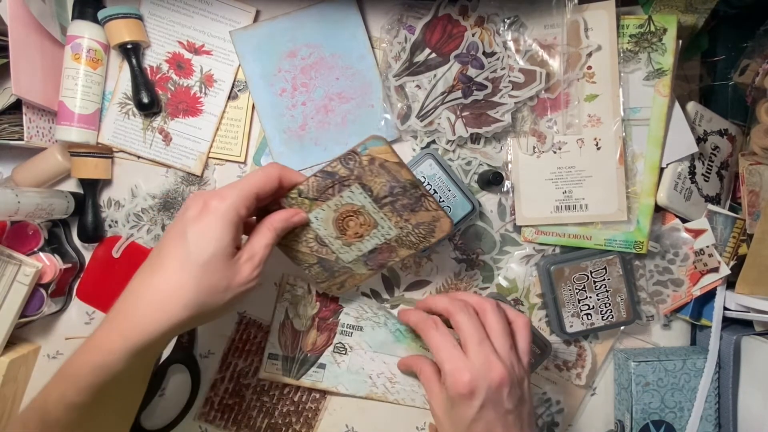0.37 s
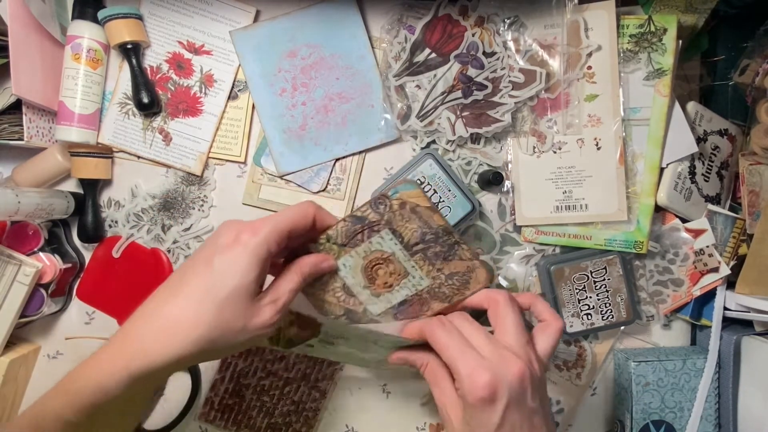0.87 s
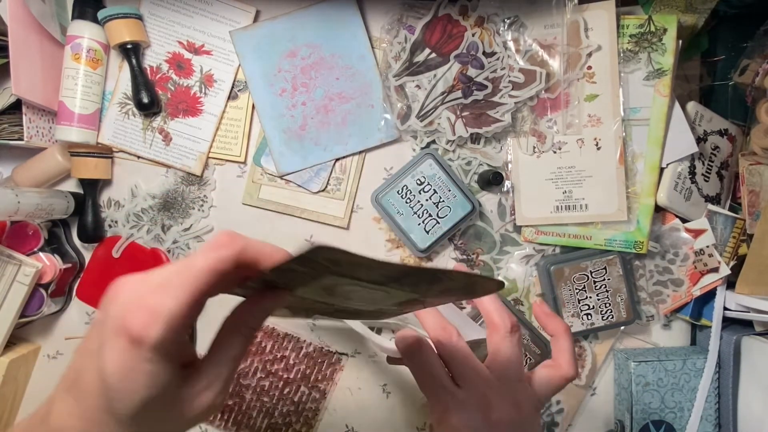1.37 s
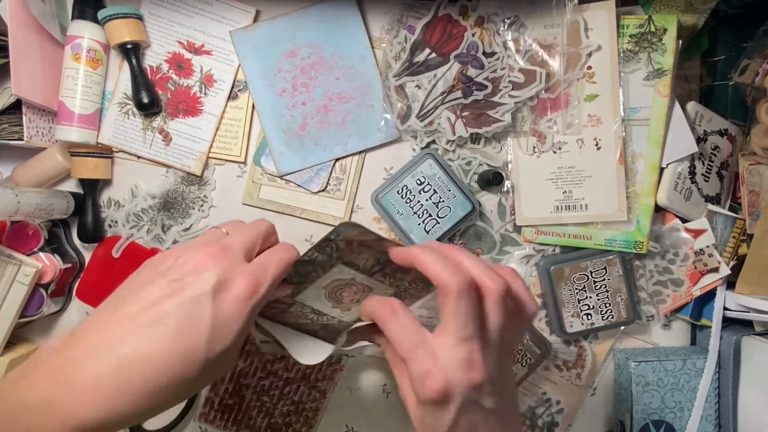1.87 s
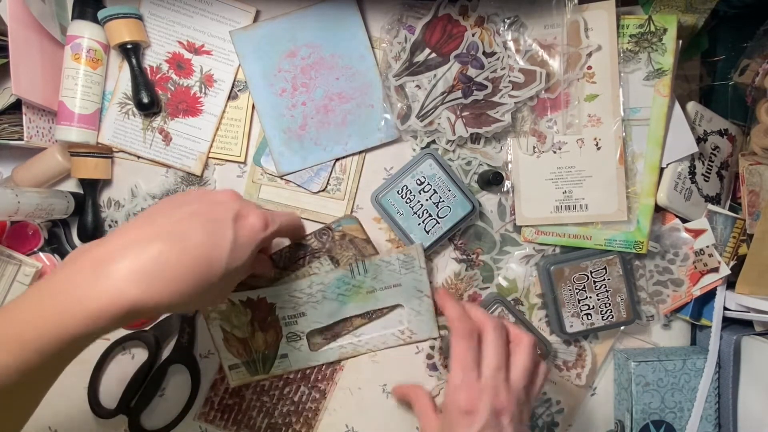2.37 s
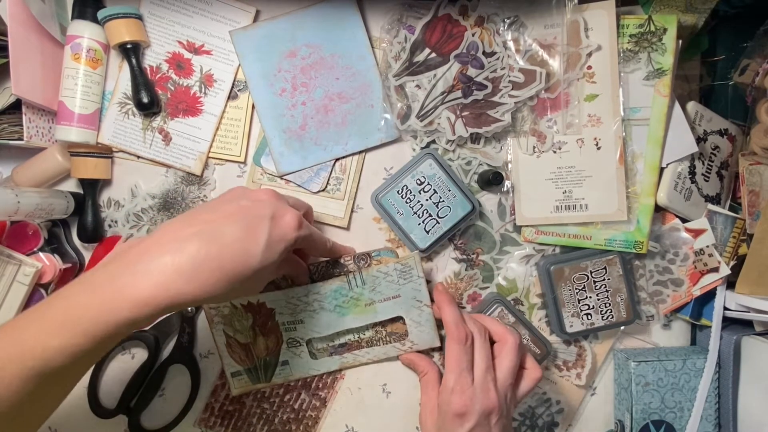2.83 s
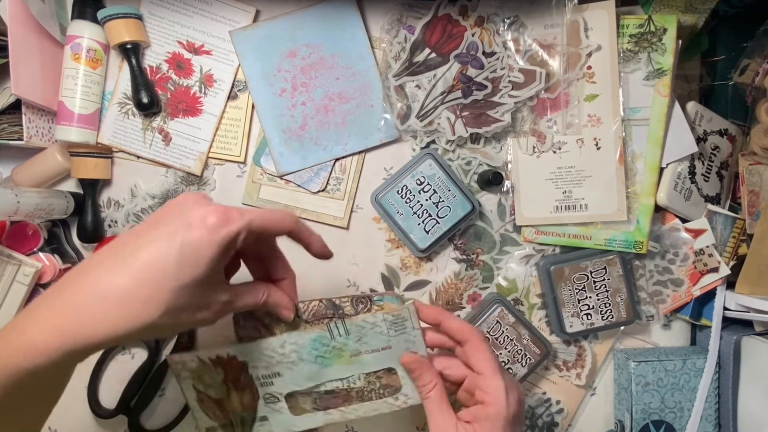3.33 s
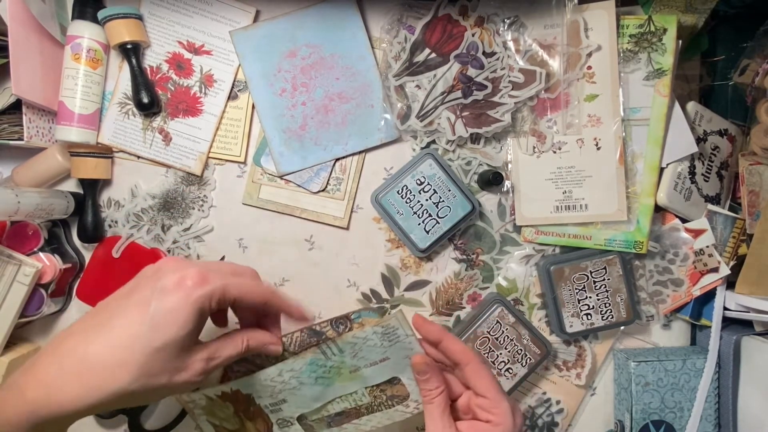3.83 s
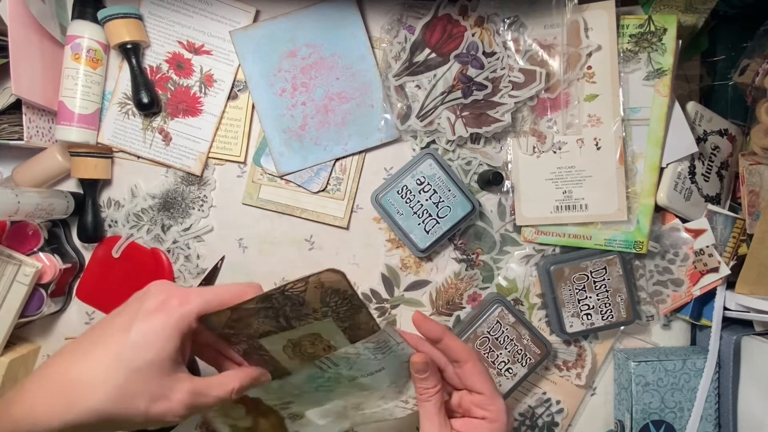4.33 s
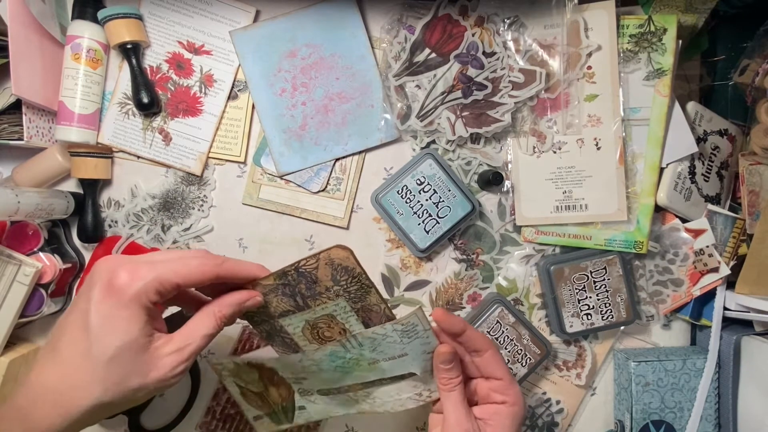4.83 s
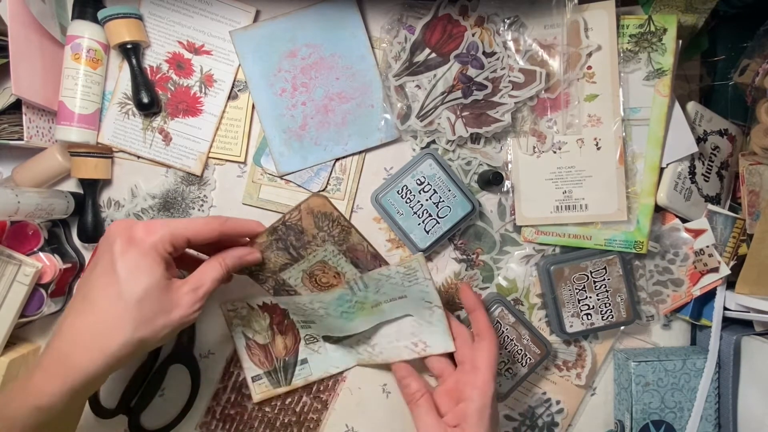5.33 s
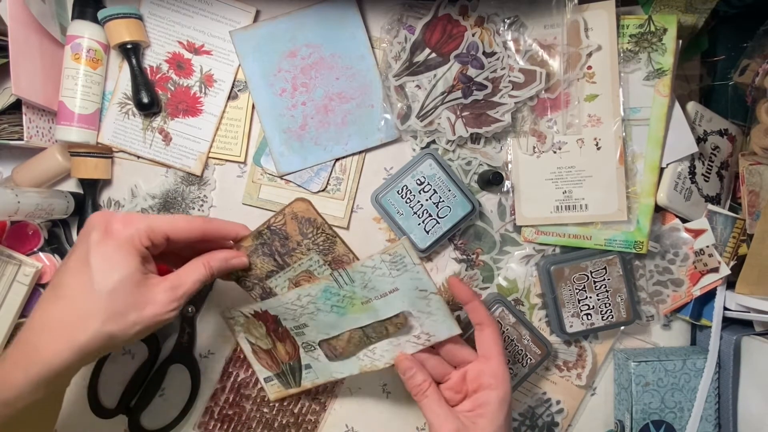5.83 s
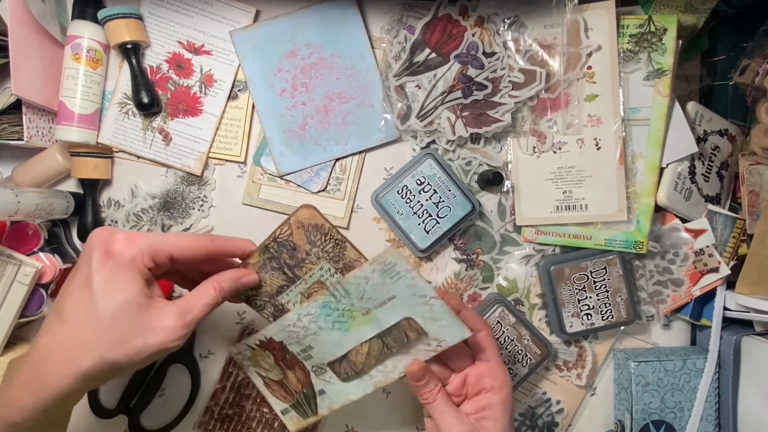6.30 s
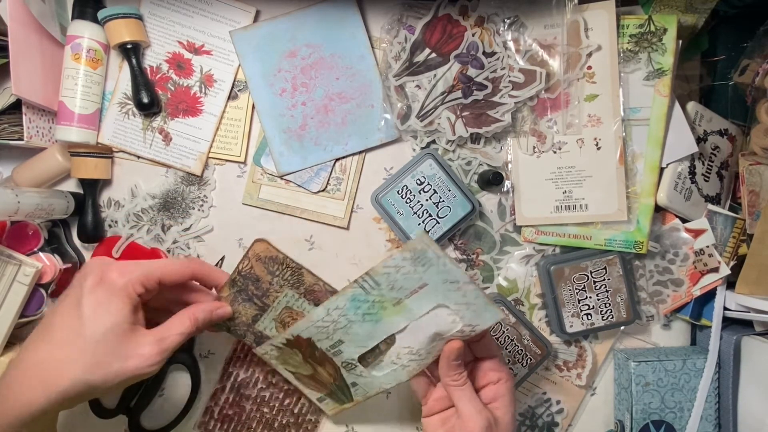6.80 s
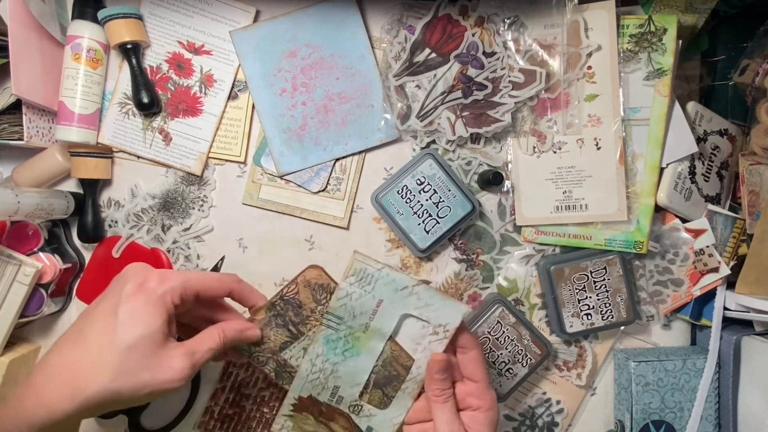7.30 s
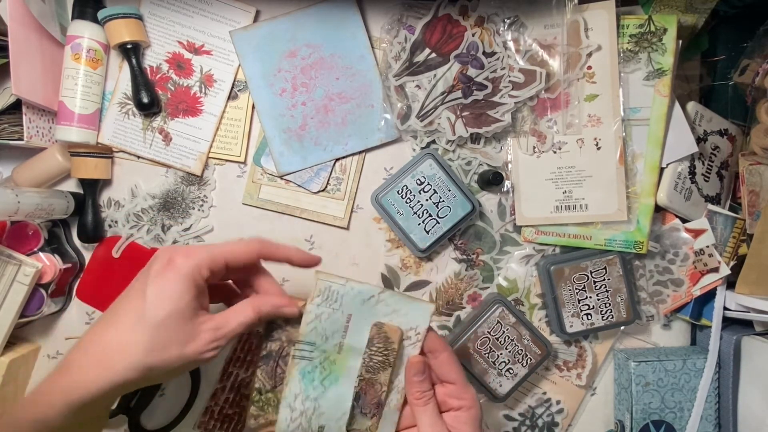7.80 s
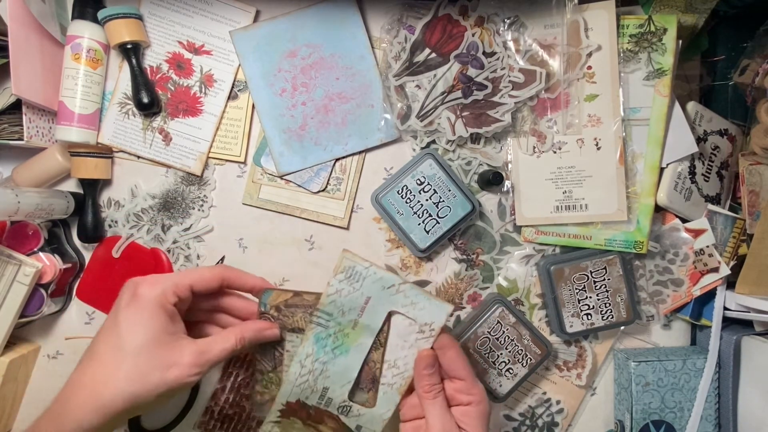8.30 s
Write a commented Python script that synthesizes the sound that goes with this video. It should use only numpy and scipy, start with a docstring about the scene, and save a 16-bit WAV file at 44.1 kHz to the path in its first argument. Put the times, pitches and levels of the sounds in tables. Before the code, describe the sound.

Hands fiddle with crisp paper at a table: rustling strokes, creases popping, hollow papery flutter, brief pauses, a few soft low bumps.

```python
"""Card in a paper pocket

Hands slide a card in and out of a paper pocket above a craft table, close to two microphone ports.
Rubbing strokes are clumped stick-slip clicks: sliding fibres hiss, bending creases crackle.
Creases flip with sharp noise bursts through resonances, and the hollow pocket rings near 900 Hz.
The card taps once as a decaying sine; wrist bumps are sagging sines over faint filtered-noise rumble and hiss."""
import sys
import numpy as np
from scipy import signal
from scipy.io import wavfile
from scipy.ndimage import uniform_filter1d

SR = 44100
rng = np.random.default_rng(int(sys.argv[2]) if len(sys.argv) > 2 else 0)


def ratio(d):
    """dB to gain"""
    e = np.asarray(d, float) / 20
    return 10 ** e


def waveform_to_disk(signal):
    """Save audio, clipped to [-1, 1], as 16-bit WAV at the path in sys.argv[1]."""
    frames = np.transpose(np.atleast_2d(signal))
    scaled = np.clip(frames, -1, 1) * 32767
    samples = np.round(scaled).astype(np.int16)
    wavfile.write(sys.argv[1], SR, samples)


N = 371322

# hand strokes: (peak time [s], swell [s], fade [s], sliding level at 8.5-12.5 kHz [dB], flexing level [dB])
STROKES = [(0, 0.007, 0.05, -83.5, -75), (0.069, 0.018, 0.041, -91.5, -74),
           (0.174, 0.033, 0.026, -64.5, -61), (0.18, 0.073, 0.063, -83, -62),
           (0.255, 0.024, 0.038, -96, -67.0), (0.296, 0.029, 0.066, -68, -62),
           (0.392, 0.029, 0.051, -73, -60), (0.445, 0.017, 0.054, -55.5, -67),
           (0.497, 0.032, 0.095, -57.5, -47.5), (0.622, 0.04, 0.062, -58, -48.5),
           (0.676, 0.066, 0.054, -59.5, -48.5), (0.881, 0.16, 0.062, -55, -52.5),
           (0.938, 0.03, 0.065, -52, -48), (1.045, 0.03, 0.031, -48.5, -49),
           (1.127, 0.28, 0.052, -73.0, -61), (1.212, 0.047, 0.054, -68.5, -56.5),
           (1.33, 0.024, 0.041, -70.5, -58), (1.425, 0.043, 0.081, -81, -75),
           (1.522, 0.0081, 0.019, -59.0, -60), (1.565, 0.061, 0.027, -54.5, -49.5),
           (1.656, 0.053, 0.035, -49.5, -47), (1.722, 0.038, 0.071, -55, -52.5),
           (1.773, 0.017, 0.055, -52, -41.5), (1.88, 0.012, 0.051, -52.5, -62),
           (1.949, 0.015, 0.11, -58.5, -51.5), (1.953, 0.021, 0.039, -45.5, -51),
           (2.201, 0.098, 0.041, -54.5, -57), (2.322, 0.09, 0.24, -61.5, -60.0),
           (2.493, 0.081, 0.076, -58, -56.5), (2.672, 0.053, 0.02, -59.5, -57.0),
           (2.717, 0.041, 0.054, -74.5, -64.5), (2.802, 0.038, 0.033, -85, -78.5),
           (2.867, 0.033, 0.022, -68.5, -64), (2.943, 0.036, 0.04, -66, -61.5),
           (3.061, 0.072, 0.039, -75, -61.5), (3.126, 0.024, 0.069, -57.5, -66),
           (3.283, 0.038, 0.039, -58.5, -58), (3.397, 0.14, 0.031, -63, -76.0),
           (3.51, 0.078, 0.078, -60.5, -65), (3.698, 0.073, 0.077, -64.5, -73),
           (3.985, 0.082, 0.046, -45.5, -52.5), (4.145, 0.012, 0.015, -44, -73),
           (4.155, 0.076, 0.11, -46.0, -72), (4.276, 0.0089, 0.015, -48.5, -68),
           (4.291, 0.021, 0.064, -52.5, -49.5), (4.416, 0.02, 0.029, -57.5, -61),
           (4.477, 0.028, 0.028, -73, -61.5), (4.572, 0.046, 0.029, -76, -73),
           (4.644, 0.032, 0.07, -65.5, -65.5), (4.844, 0.074, 0.1, -59, -62),
           (5.069, 0.077, 0.029, -57, -57.5), (5.119, 0.032, 0.044, -67, -56),
           (5.284, 0.15, 0.046, -59.5, -56), (5.34, 0.017, 0.029, -59.5, -49),
           (5.416, 0.029, 0.13, -62.5, -45.5), (5.506, 0.034, 0.035, -54.5, -85),
           (5.668, 0.26, 0.062, -63, -62.5), (5.817, 0.061, 0.12, -55.0, -51),
           (6.005, 0.012, 0.039, -78, -57.5), (6.087, 0.057, 0.029, -56, -54),
           (6.175, 0.038, 0.06, -65, -61), (6.244, 0.036, 0.17, -65.5, -65.5),
           (6.459, 0.065, 0.05, -51, -58.5), (6.647, 0.073, 0.044, -48.5, -56.5),
           (6.749, 0.082, 0.08, -55, -57.0), (6.853, 0.02, 0.052, -51.5, -56),
           (6.978, 0.016, 0.019, -56, -57), (7.04, 0.064, 0.082, -52.0, -62), (7.11, 0.026, 0.02, -53, -76),
           (7.246, 0.093, 0.032, -78, -70.5), (7.36, 0.013, 0.1, -69, -66), (7.507, 0.024, 0.033, -45, -69),
           (7.52, 0.2, 0.036, -60, -61), (7.577, 0.039, 0.033, -81, -70), (7.633, 0.034, 0.079, -54, -58),
           (7.786, 0.1, 0.025, -53.5, -63), (7.873, 0.059, 0.13, -65, -52), (7.983, 0.04, 0.11, -62, -62),
           (8.096, 0.0053, 0.55, -82, -68.5), (8.114, 0.023, 0.015, -62, -71),
           (8.303, 0.039, 0.031, -55.5, -63), (8.393, 0.046, 0.24, -54, -55)]
# spectrum of scraping fibres: (frequency [Hz], level [dB per Hz])
SCRAPE_SPECTRUM = [(300, -30), (700, -3), (2000, -5), (4500, 0), (6000, 2.5), (9000, -2.5), (12000, -3.5),
                   (15800, -6.5)]
# spectrum of crackling creases: (frequency [Hz], level [dB per Hz])
CRACKLE_SPECTRUM = [(500, -35.5), (1100, -2.5), (1700, 4), (2700, 2), (4000, -3.5), (5500, -8), (9000, -24)]
# resonances of the pocket's air and walls: (frequency [Hz], width of one pass [Hz], level [dB])
POCKET_MODES = [(754, 433, 2.5), (883, 230, 5.5), (1245, 198, 5)]
# how far the pocket gapes: (time [s], ring level re stroke [dB])
POCKET_GAPE = [(0, -4), (.4, -22), (.95, -0.5), (1.2, -2.5), (1.8, -2), (2.05, 3.5), (2.4, -11.5),
               (3.3, -3), (3.9, -17), (4.15, 1.5), (4.45, 4.5), (4.7, -2.5), (5.5, -15.5), (5.9, -9.5),
               (6.5, -5), (6.9, -8), (7.4, -2), (7.9, 2), (8.15, 6), (8.42, -9)]
# flipping creases: (onset [s], sheet peak [dB], patch ring [Hz], pocket ring re sheet peak [dB],
# treble crack re sheet peak [dB]); ring and crack levels are rms over the first 10 ms
CREASE_SNAPS = [(.389, -36, 2560, -16.5, -13.5), (.396, -34, 2760, -21, -27), (0.433, -35, 3570, -38, -19),
                (0.481, -38.5, 2940, -15, -13), (.508, -15.5, 2480, -21, -39), (0.612, -36, 2170, -29, -13),
                (.622, -32, 2180, -30, -25), (0.639, -38, 2040, -11, -21), (.664, -8.5, 4500, -30.5, -35.5),
                (.76, -44.5, 1830, -9, -8), (0.92, -37, 2770, -36, -9), (.938, -27.5, 1810, -42, -17),
                (1.019, -28, 2880, -24, -16), (1.058, -27.5, 3510, -40, -25), (1.074, -29, 2280, -24, -38),
                (1.09, -23.5, 2500, -38, -48), (1.138, -31, 1760, -16.5, -29),
                (1.514, -33.5, 2570, -46, -16.5), (1.716, -22.5, 4640, -31, -32),
                (1.766, -27.5, 2470, -12.5, -27), (1.789, -25, 2060, -33, -23), (1.877, -38, 1600, -35, -8),
                (1.968, -28, 1650, -23, -49), (2.003, -22.5, 1580, -23, -39), (2.308, -42, 1690, -33, -12),
                (2.634, -49.5, 2430, -25, -5), (2.721, -40.5, 1570, -21, -29), (2.869, -46, 1780, -18, -22),
                (3.057, -49.5, 1730, -40, -8.5), (3.105, -44.5, 3500, -20, -6),
                (3.27, -29, 1680, -18.5, -43), (3.29, -28.5, 1440, -22, -18),
                (3.709, -47.5, 2880, -15, -10), (3.843, -56.5, 1600, -11, -10), (3.985, -41, 1715, -8, -9),
                (4.259, -45, 5540, -8, -11), (4.413, -37.5, 2500, -21, -12), (4.436, -43, 1600, -10, -25),
                (4.455, -51, 1700, -5, -21), (4.474, -37.5, 1710, -15.5, -15.5),
                (4.624, -45, 2140, -18, -13), (4.769, -32, 3460, -16.5, -49), (5.112, -16, 4440, -36, -29),
                (5.136, -36, 2010, -20, -32), (5.337, -32.5, 1540, -22, -32), (5.392, -29, 2320, -45, -33),
                (5.417, -29, 1880, -42, -18), (5.749, -27.5, 3860, -20, -25),
                (5.874, -38.5, 2020, -11.5, -31), (5.909, -45, 2780, -11, -13),
                (6.0, -38.5, 1780, -23.5, -29), (6.052, -48, 4340, -38, -8), (6.457, -24.5, 2500, -20, -29),
                (6.671, -35.5, 3110, -12, -25), (6.733, -46, 2650, -6, -24), (6.824, -36, 1720, -28, -18),
                (7.002, -31, 3150, -23, -20), (7.044, -44, 1600, -9, -20), (7.192, -56.5, 1700, -6, -14),
                (7.239, -50, 1810, -7, -14), (7.459, -21, 1470, -28, -35), (7.478, -10, 3570, -36.5, -27.5),
                (7.536, -31, 1540, -10, -17), (7.612, -36, 3750, -16, -13), (7.765, -41, 2610, -13.5, -32),
                (7.797, -35, 1570, -13.5, -30), (7.812, -40.5, 1840, -5, -31),
                (7.847, -25.5, 3260, -17, -42), (7.885, -33.5, 1640, -17.5, -29),
                (7.906, -26.5, 3260, -26, -44), (7.953, -33, 2620, -38, -39),
                (7.986, -32.5, 1800, -12, -18), (8.006, -43, 1810, -10, -26),
                (8.116, -44, 1550, -12, -13.5), (8.135, -54, 1600, -6.5, -22), (8.158, -53, 1600, -5, -20),
                (8.18, -51.5, 1800, -6, -18), (8.206, -52, 1600, -9, -15), (8.334, -49, 4970, -1, -28)]
# taps of the stiff card: (time [s], level [dB], frequency [Hz], t60 [s])
CARD_KNOCKS = [(6.457, -38, 600, .12)]
# wrist on the table: (time [s], blow peak [dB], nominal frequency, sags from 1.6 to 0.46 times it [Hz], t60 [s])
WRIST_BUMPS = [(2.389, -48, 76.3, 0.096), (2.429, -46.5, 78, 0.071), (2.516, -38, 107, 0.08),
               (2.681, -51, 70, 0.059), (2.725, -39, 115, 0.096), (2.76, -48, 111, 0.061)]
# rumble of table and room: (time [s], level [dB])
RUMBLE_LEVEL = [(0, -65.5), (.61, -58), (.82, -67), (1.5, -76), (1.69, -65.5), (2.3, -72), (2.6, -73),
                (3.0, -65.5), (3.56, -75), (4.41, -66.5), (4.83, -72), (8.42, -73.5)]
# its spectrum: (frequency [Hz], level [dB per Hz])
RUMBLE_SPECTRUM = [(18, -27), (30, -5.5), (96, -2.5), (275, -7), (330, -5), (622, -5.5), (700, -27.5),
                   (910, -19), (1540, -120)]
# port pair: (frequency [Hz], left minus right [dB], phase lead of left [rad], likeness at wander 1 [0-1])
PORT_PAIR = [(100, 1, -0.76, 0.95), (188, -1.5, 1.72, 1), (272, -1.5, 0.5, 0.76), (548, 3, 2.3, 0.32),
             (1020, -9, -1, 0.15), (1260, -3.5, -0.07, 0.55), (2070, -1, 0.47, 0.56),
             (2610, -6.5, 0.74, 0.31), (3200, -5, 0.41, 0.27), (4540, -3.5, 1.88, 1),
             (5070, -5.5, 1.38, 0.4), (5540, 1, 1.26, 0.4), (6680, -1, 2.5, 0.99), (7200, 0.5, 3, .998),
             (9120, -0.5, 5.5, 0.67), (12700, 0.5, 8, .99), (13900, 1, 8.5, .998), (14370, -0.5, 10, .98),
             (15900, -1, 11, 0.2)]

EDGE_HZ = 15900  # top of the band


def evened(x):
    """Scales to rms 1."""
    return x / np.sqrt(np.mean(x ** 2) + 1e-20)


def curve(rows):
    """Columns of a time table, one value a sample."""
    s, *columns = np.transpose(rows)
    return [np.interp(np.arange(N) / SR, s, c) for c in columns]


def add(mix, s, sound):
    """Mixes a sound in at time s."""
    part = mix[round(s * SR):][:len(sound)]
    part += sound[:len(part)]


def colour(x, points):
    """Minimum-phase filter with the given spectrum, so that clicks keep a sharp front."""
    f, db = np.transpose(points)
    hz = np.maximum(abs(np.fft.fftfreq(4096, 1 / SR)), 1)
    log_gain = np.log(ratio(np.interp(np.log(hz), np.log(f), db)))
    taps = np.fft.ifft(np.exp(np.conj(signal.hilbert(log_gain)))).real[:2048]
    return signal.oaconvolve(x, taps)[:len(x)]


def band(x, lo_hz, hi_hz):
    """Band-pass."""
    sos = signal.butter(2, [lo_hz, min(hi_hz, SR / 2.1)], "band", fs=SR, output="sos")
    return signal.sosfilt(sos, x)


def ring(x, hz, width_hz):
    """One resonance of gain 1."""
    return signal.lfilter(*signal.iirpeak(hz, hz / width_hz, SR), x)


def rustle():
    """Scraping fibres hiss, bending creases crackle, sparser slips drive the pocket, hands push the table top."""
    slide, flex = strokes()
    scrape = colour(slips(per_s=14000, spread_db=2.5, clump_db=1.3, clump_s=0.008), SCRAPE_SPECTRUM)
    scrape /= np.std(band(scrape, 8500, 12500))

    bends = slips(per_s=2600, spread_db=3.4, clump_db=2.2, clump_s=0.006)
    patch_rings = evened(patches(bends, count=24))
    crackle = evened(colour(evened(bends) + ratio(-3.5) * patch_rings, CRACKLE_SPECTRUM))

    hollow = evened(pocket(slips(per_s=1300, spread_db=2.8, clump_db=3, clump_s=0.0029)))
    slide_drive_db = -15.5  # sliding shakes the pocket less than flexing
    shake = ratio(curve(POCKET_GAPE)[0]) * np.hypot(flex, ratio(slide_drive_db) * slide)

    thuds = evened(band(slips(per_s=300, spread_db=3.5, clump_db=0.5, clump_s=0.0067), 50, 410))
    return ratio(-21.5) * flex * thuds + slide * scrape + flex * crackle + shake * hollow


def strokes():
    """Each stroke swells to its peak and fades along a bell; overlapping strokes add in power."""
    peak_s, swell_s, fade_s, slide_db, flex_db = np.transpose(STROKES)
    edge_drop_db = 10  # below peak, one swell before and one fade after
    t = np.arange(0, N / SR + 0.01, 0.002)
    since = t[:, None] - peak_s
    stretch = since / np.where(since < 0, swell_s, fade_s)
    bell_power = ratio(-edge_drop_db * np.minimum(stretch ** 2, 15)) ** 2
    return [np.interp(np.arange(N) / SR, t, np.sqrt(bell_power @ ratio(db) ** 2))
            for db in (slide_db, flex_db)]


def slips(per_s, spread_db, clump_db, clump_s):
    """Stick-slip clicks of uneven size; they come in clumps that start at once and die away."""
    size = ratio(spread_db * np.minimum(rng.exponential(1, N), 5)) * rng.choice([-1., 1.], N)
    starts = rng.exponential(1, N) * (rng.random(N) < 1 / (clump_s * SR))
    clumps = np.log(0.6 + signal.lfilter([1], [1, -np.exp(-1 / (clump_s * SR))], starts))
    clicks = size * (rng.random(N) < per_s / SR)
    return clicks * ratio(clump_db * evened(clumps - clumps.mean()))


def patches(x, count):
    """Each slip rings one small stiff patch between two creases."""
    which = rng.integers(0, count, N)
    pitches_hz = np.geomspace(1500, 5500, count) * rng.uniform(0.95, 1.05, count)
    return sum(ring(x * (which == k), hz, 0.027 * hz) for k, hz in enumerate(pitches_hz))


def pocket(x):
    """The hollow between the pocket's two walls: parallel resonances, each passed twice."""
    return sum(ratio(db) * ring(ring(x, hz, w), hz, w) for hz, w, db in POCKET_MODES)


def snaps():
    """A flip is one sharp break and a burst of micro-cracks with a faint after-rattle, through patch and pocket."""
    out, t = np.zeros(N), np.arange(4000) / SR
    break_s = 0.0015
    since = np.maximum(t - break_s, 0)

    def front(part):  # rms 1 over the first 10 ms
        return part / np.std(part[:441])

    for s, db, hz, pocket_db, crack_db in CREASE_SNAPS:
        cracks = rng.standard_normal(len(t)) * np.minimum(t / break_s, 1) ** 2
        cracks[66] = 7  # the break itself

        def fading(t60_s):
            return cracks * (ratio(-60 * since / t60_s) + ratio(-13.5 - 60 * since / 0.11))

        patch = ring(fading(0.67 * 0.023), hz, 0.21 * hz)
        sheet = patch + ratio(-13.5) * band(fading(0.7 * 0.023), 1340, 6360)
        hollow = pocket(fading(1.22 * 0.023))
        crack = band(fading(0.023), 3300, EDGE_HZ)
        puff = band(band(fading(1.8 * 0.023), 140, 420), 140, 420)  # air pushed out of the pocket
        sound = sheet / abs(sheet).max()
        sound += ratio(pocket_db) * (front(hollow) + ratio(-17) * front(puff))
        sound += ratio(crack_db) * front(crack)
        add(out, s, ratio(db) * sound)
    return out


def knock():
    """A tap of the stiff card leaves a short low ring: a decaying sine."""
    out, t = np.zeros(N), np.arange(8000) / SR
    for s, db, hz, t60_s in CARD_KNOCKS:
        attack = np.minimum(t / 0.0025, 1)
        add(out, s, ratio(db - 60 * t / t60_s) * attack * np.sin(2 * np.pi * hz * t))
    return out


def table():
    """Soft blows ring the table top for a few sagging cycles, over a low rumble of drifting level."""
    spectrum = [*RUMBLE_SPECTRUM, (2000, -59.5)]  # weak floor from 2 kHz up
    rumble = evened(colour(rng.standard_normal(N), spectrum))
    out, t = ratio(curve(RUMBLE_LEVEL)[0]) * rumble, np.arange(16000) / SR
    for s, db, hz, t60_s in WRIST_BUMPS:
        cycles = hz * (0.46 * t + 0.015 * (1 - np.exp(-t / 0.013)))
        blow = np.sin(2 * np.pi * cycles) * (1 - np.exp(-t / 0.0085)) * ratio(-60 * t / t60_s)
        # the frame shakes on
        shudder = evened(band(rng.standard_normal(len(t)), 45, 120)) * ratio(-14 - 60 * t / 0.5)
        add(out, s, ratio(db) * (blow / abs(blow).max() + shudder * np.minimum(t / 0.013, 1)))
    return out


def hiss():
    """Air and electronics: steady white noise."""
    return ratio(-93) * rng.standard_normal(N)


def ports(x, wander):
    """The two ports differ in level and phase by frequency; as the hands move, the paths wander at random."""
    hz, t, z = signal.stft(x, SR, nperseg=512, noverlap=384)
    f, *columns = np.transpose(PORT_PAIR)
    lr_db, lead_rad, same = (np.interp(hz, f, c)[:, None] for c in columns)
    spread_rad = wander * np.sqrt(-2 * np.log(np.clip(same, 0.05, 1)))
    drift = rng.standard_normal((2, len(t), len(hz)))
    drift = uniform_filter1d(drift, size=10, axis=2)  # over frequency
    drift = uniform_filter1d(drift, size=36, axis=1)  # over about 0.1 s
    level_drift, phase_drift = evened(drift).transpose(0, 2, 1)
    half = ratio((lr_db + 2.77 * spread_rad * level_drift) / 2)
    half = half * np.exp(0.5j * (lead_rad + spread_rad * phase_drift))
    return signal.istft(np.array([z * half, z / half]), SR, nperseg=512, noverlap=384)[1][:, :N]


def scene():
    """Rubbing, table and hiss wander widely between the ports; snaps and knock, each at one spot, wander less."""
    flips = ports(snaps() + knock(), wander=0.3)
    spread_out = ports(rustle() + table() + hiss(), wander=0.96)
    return spread_out + flips


def top_cut(x):
    """Nothing passes above the cut-off."""
    return signal.sosfilt(signal.butter(12, 17080, fs=SR, output="sos"), x)


def record(dry):
    """Bass roll-off at 38 Hz and band limit at EDGE_HZ."""
    dry = signal.sosfilt(signal.butter(2, 38, "high", fs=SR, output="sos"), dry)
    limited = signal.oaconvolve(dry, signal.firwin(255, EDGE_HZ, fs=SR)[None], "same", axes=1)
    return top_cut(limited)


dry = scene()
out = record(dry)
waveform_to_disk(out)
```